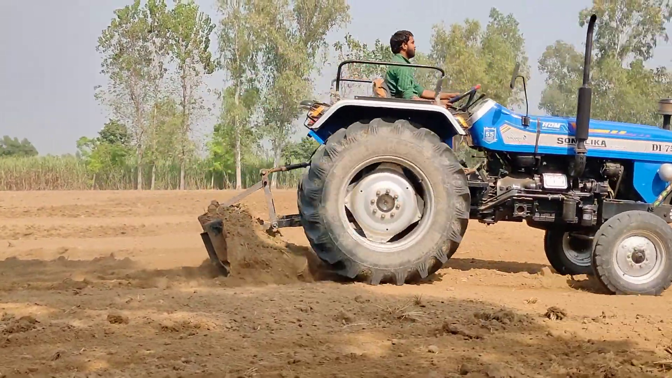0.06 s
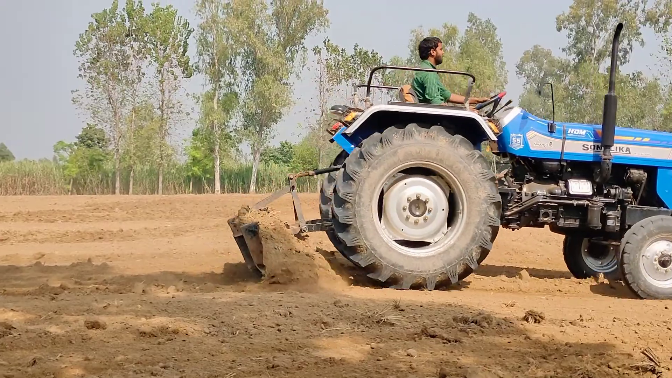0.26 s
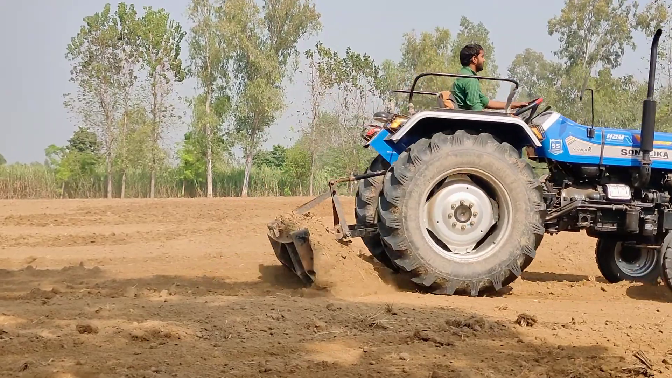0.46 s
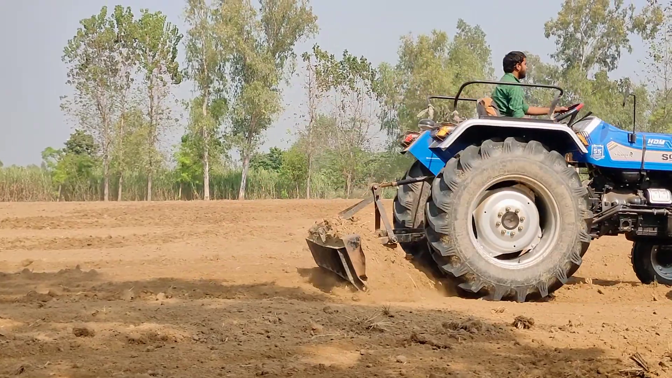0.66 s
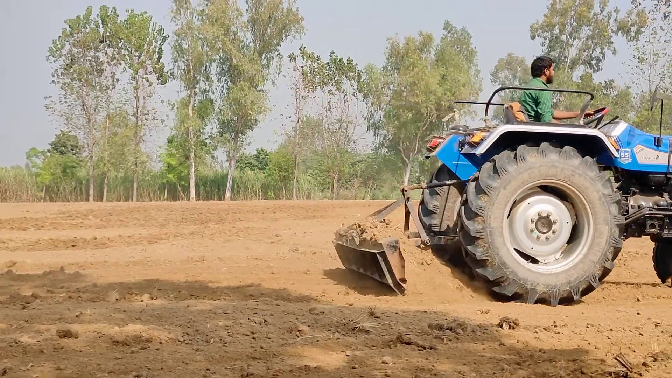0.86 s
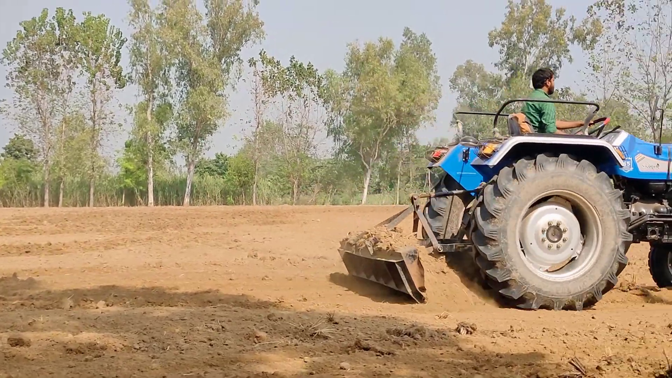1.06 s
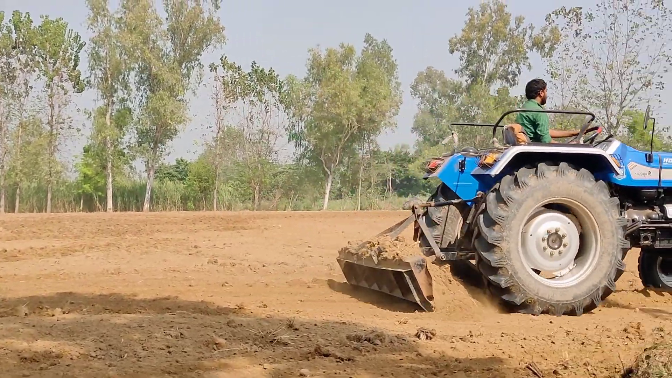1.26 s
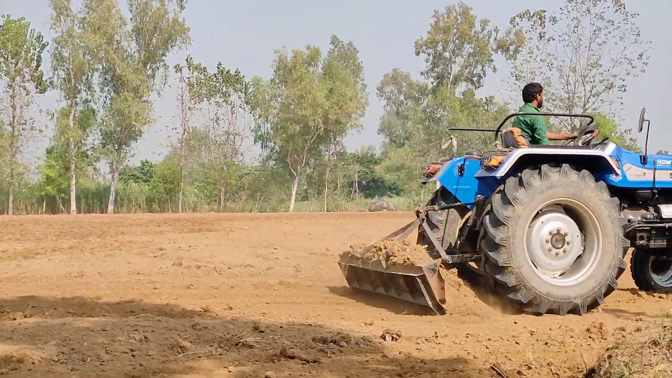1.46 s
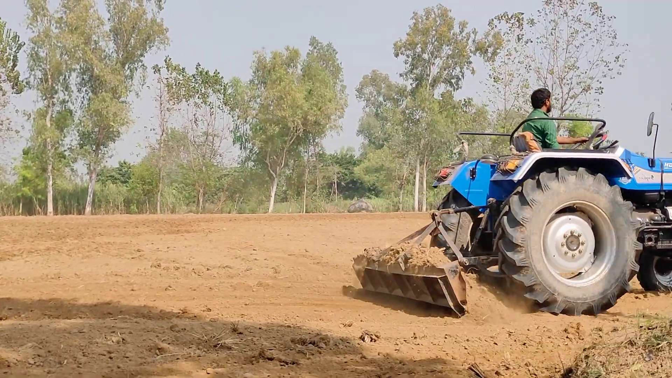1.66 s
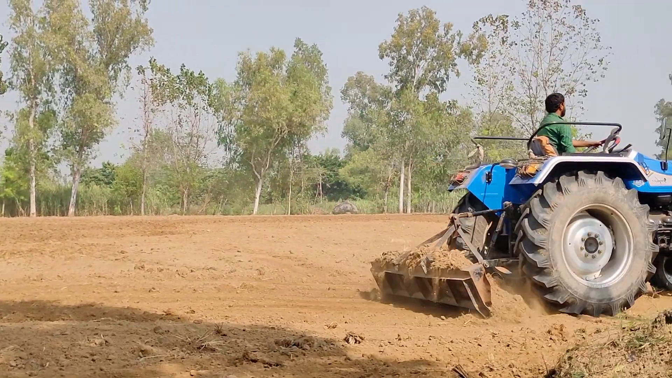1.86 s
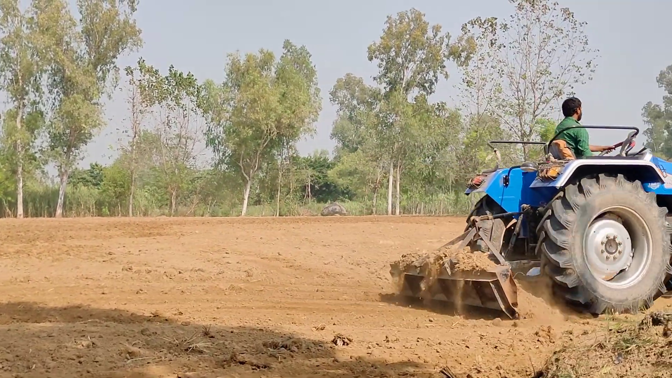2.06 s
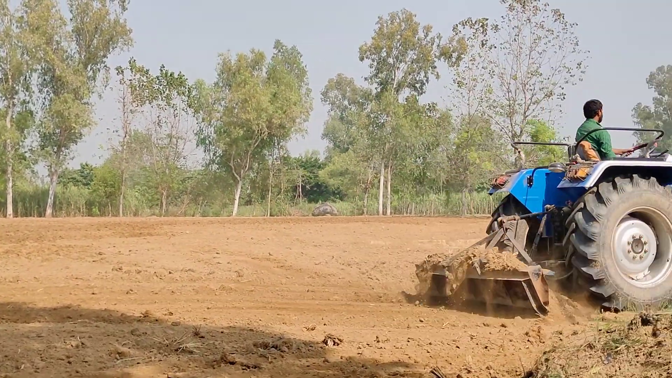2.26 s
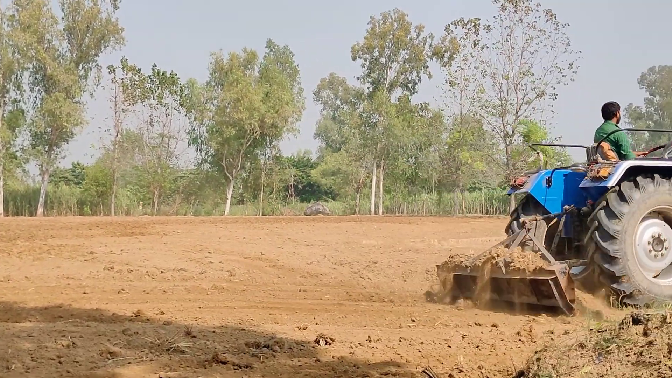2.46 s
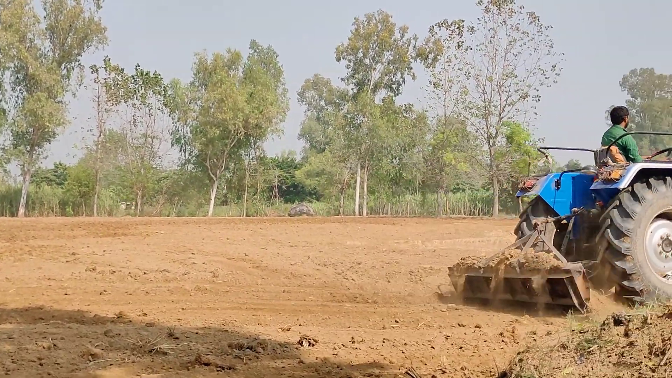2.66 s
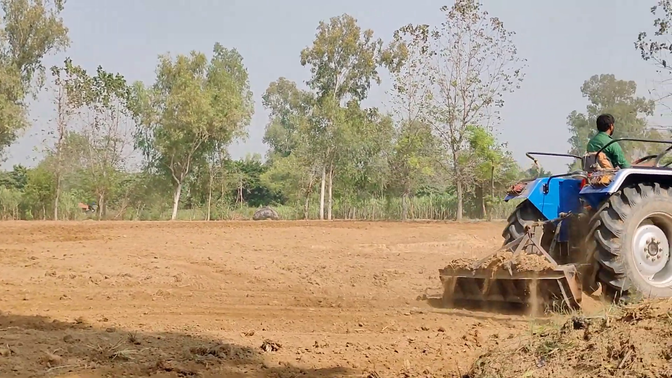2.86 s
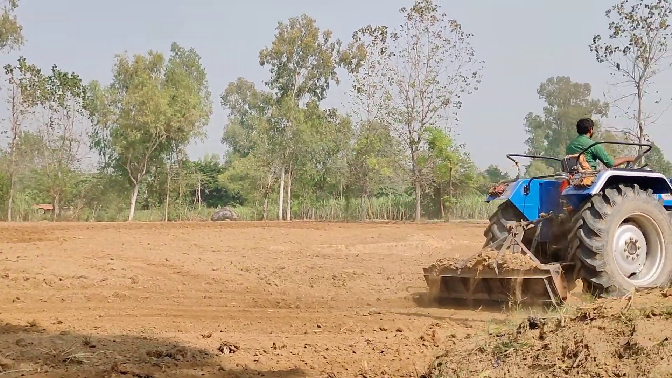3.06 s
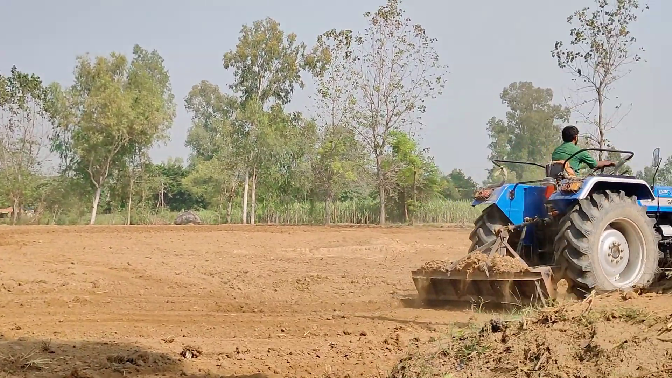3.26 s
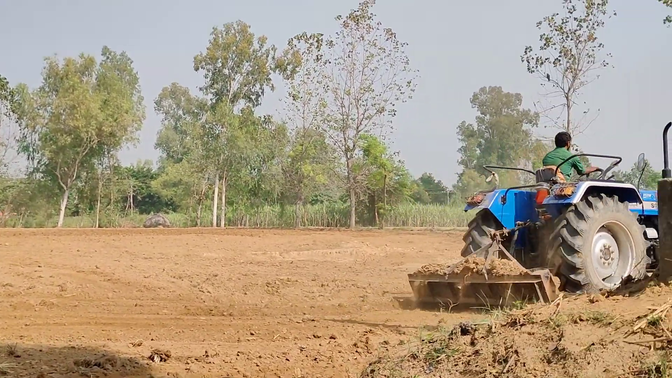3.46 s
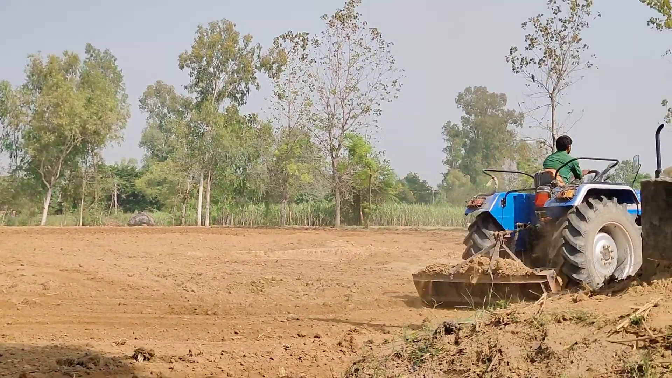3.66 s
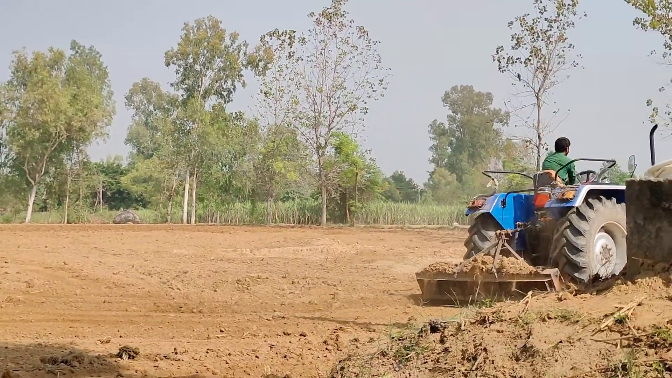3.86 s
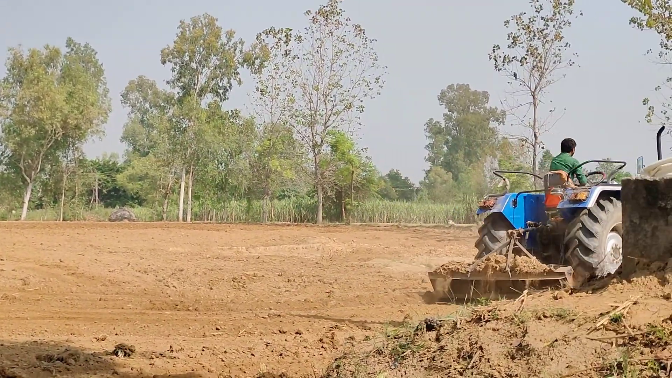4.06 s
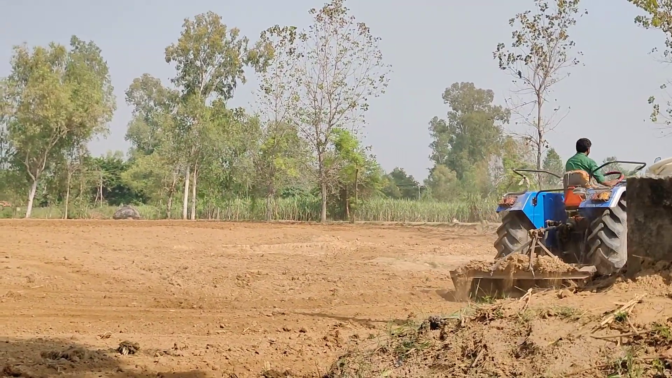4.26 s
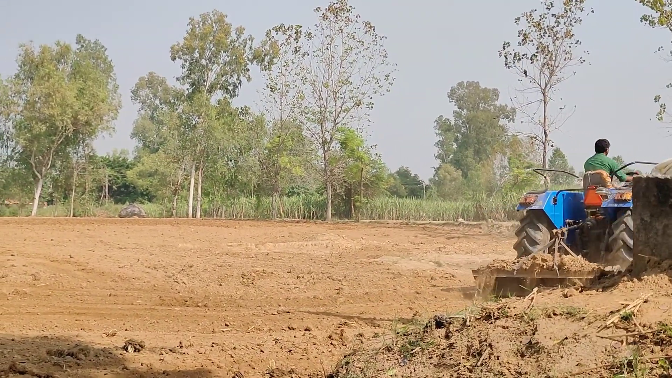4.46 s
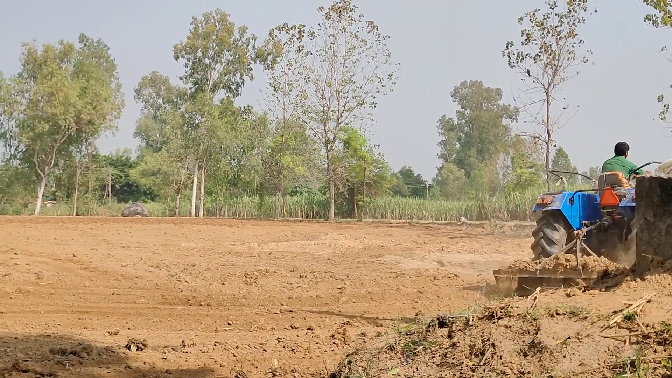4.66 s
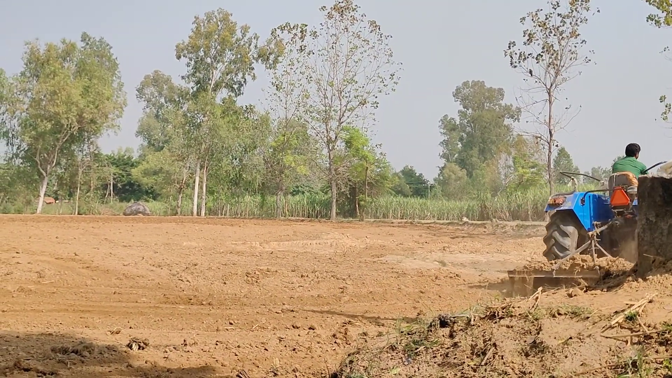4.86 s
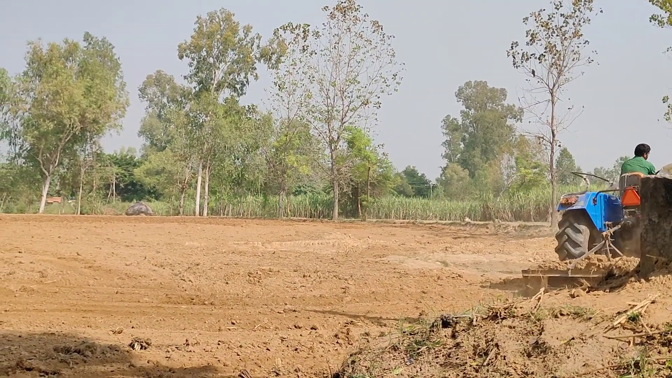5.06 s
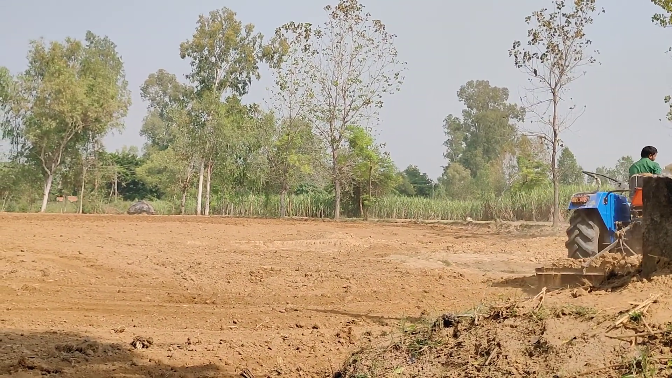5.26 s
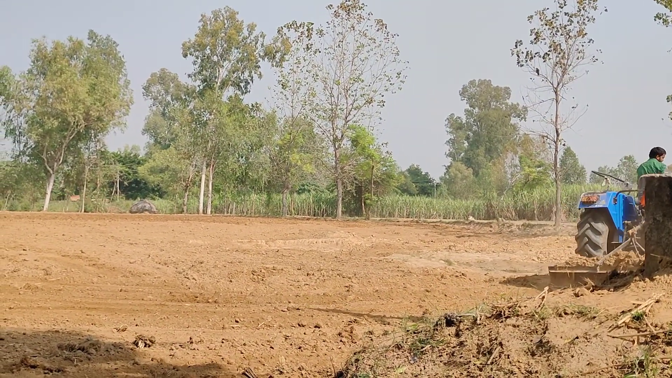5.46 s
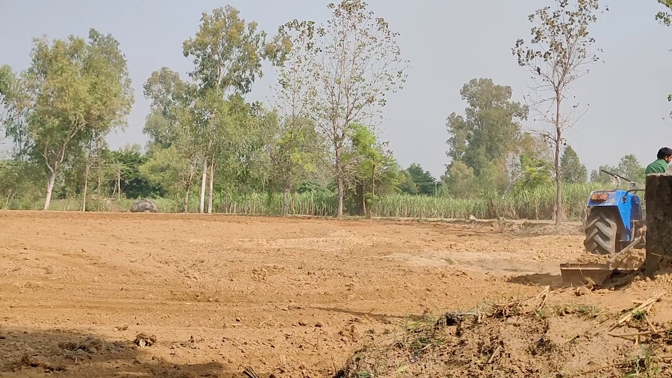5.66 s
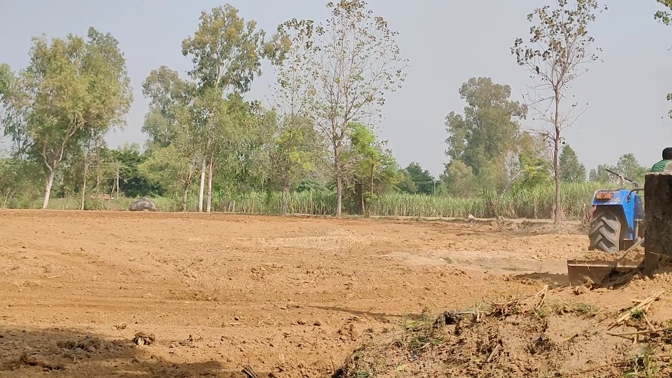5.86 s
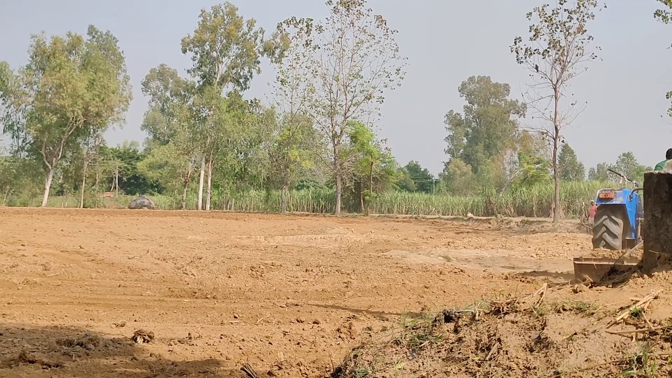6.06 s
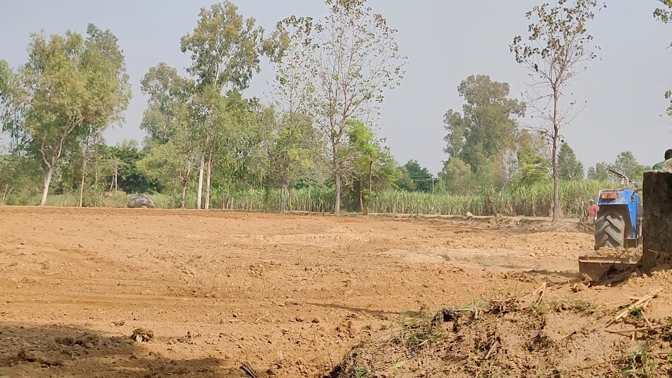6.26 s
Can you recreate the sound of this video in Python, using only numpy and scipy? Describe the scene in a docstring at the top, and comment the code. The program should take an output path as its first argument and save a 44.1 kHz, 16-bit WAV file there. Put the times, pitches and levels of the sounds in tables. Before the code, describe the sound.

At 0 seconds a diesel tractor is already close, side-on and at its loudest: about 35 exhaust thuds a second merge into a rough, throbbing low drone, with a sharp knock at each firing, puffing gas, clattering gears and a faint whine. Dry clods crackle along the dragged blade. The bass swells briefly at 0.1 and 1.1 seconds. The fuel eases at about 1.35, then at 1.5 the blade linkage gives one short rattle. The tractor turns away and recedes; whine and soil sounds fade. Around 2.5 to 3.2 the engine pulls slightly harder, with a hard knock near 2.6, then dips sharply at 3.3. From 4 seconds it slows; a hard knock lands near 4.7 and the power drops again near 4.9. It picks up slightly at 5.1 and labors at about 25 firings a second, duller and distant, until 6.3, over faint open-field hiss.

```python
"""A diesel tractor drags a leveller blade away over an open field, slowing from 35 to 25 firings a second.
Each firing gives a thud from the exhaust, built from sine waves, and a sharp knock of noise from the block.
Gas puffs and churns in the pipe, gears clatter and whine, and the fuel feed rises, eases and is cut twice.
Soil crumbles along the blade, the linkage rattles once, and the field hisses faintly behind it all."""
import sys
import numpy as np
from scipy import signal
from scipy.io import wavfile
from scipy.ndimage import uniform_filter1d

SR = 44100
rng = np.random.default_rng(int(sys.argv[2]) if len(sys.argv) > 2 else 0)


def log_audio(samples):
    """Write samples as a 16-bit WAV file to the path given in sys.argv[1]."""
    # one column per channel
    frames = np.atleast_2d(samples).T
    # limit to full scale, then quantise
    limited = np.clip(frames, -1, 1)
    pcm = np.round(limited * 32767).astype(np.int16)
    wavfile.write(sys.argv[1], SR, pcm)


N = 278271
T = np.arange(N) / SR  # time in seconds

# How loud the knock and the gears are. Columns: starting level in dB, dB gained from behind,
# dB gained per octave of slowing, share of the fuel change (a plain factor).
COMBUSTION_LEVEL = (-47.5, 12.5, -16, 1.5)
GEAR_LEVEL = (-41.5, -1.5, -9.5, 0.33)
# Tone of the clatter heard from behind. Each row: frequency in Hz, relative level in dB.
REAR_CLATTER_TONE = [(100, -4), (250, 5.5), (330, -14.5), (420, -1.5), (560, -10), (700, 0.5), (1050, -3),
                     (1450, -4.5), (2100, -5.5), (2750, -9), (3400, -2), (4800, 1), (6400, -11),
                     (8300, -34.5)]
BOOM_DB = 7  # lift at the centre of the exhaust resonance


def exhaust(turns):
    """One gas pulse a firing: its orders (multiples of the firing rate) pass the pipe and silencer."""
    # How loud each group of orders is. Columns: starting level in dB, dB gained from behind,
    # dB gained per octave of slowing, share of the fuel change (a plain factor).
    thud_level = (-38, 3.5, -0.5, 0.58)
    drone_level = (-41.5, -1, 13, 0.06)
    bark_level = (-37.5, -7, -4, 0.5)
    # What the pipe and silencer let through. Each row: frequency in Hz, relative gain in dB.
    pipe_gain = [(25, -5), (35, 4), (51, 5.5), (70, 2), (102, 22.5), (127, 4.5), (140, -2), (160, -5),
                 (175, 2), (209, 1), (240, -35), (320, -35.5)]
    fourth_db = 8.5  # lift of the fourth order at the centre of the resonance
    rate = firing_rate()
    number, _ = stroke(turns, lead=0.23)
    # the high orders fade as the tractor turns away and slows: slow firings are softer pulses
    dull_db_per_octave = 5 * away() + 25 * lugging()

    def orders(ks, lead, spread_db):
        """A group of orders, swelling and sinking a little from firing to firing."""
        ks = ks[:, None]
        hz = ks * rate
        octaves_up = np.log2(np.maximum(hz / 125, 1))
        gain = amp(np.interp(hz, *np.transpose(pipe_gain)) - dull_db_per_octave * octaves_up)
        # the silencer holds back what lies above its resonance
        lag = 2 * np.arctan(np.maximum(hz - 180, 0) / 25)
        lift = np.where(ks == 4, amp(fourth_db * boom(hz) / BOOM_DB), 1)
        waves = gain * lift * np.cos(2 * np.pi * ks * (turns + lead) - lag)
        steady = -waves.sum(0) / np.sqrt((gain ** 2).sum(0) / 2)
        return steady * uniform_filter1d(uneven(number, spread_db), size=400)

    thud_db = level(thud_level) + boom(2 * rate) + swells()
    drone_db = level(drone_level) + boom(3 * rate)
    bark_db = level(bark_level)
    thud = orders(np.arange(1, 3), lead=.035 - .1 * lugging(), spread_db=1.1)
    drone = orders(np.arange(3, 4), lead=-.08 * lugging(), spread_db=1.2)
    bark = orders(np.arange(4, 10), lead=.04 - .15 * lugging(), spread_db=1.8)
    return amp(thud_db) * thud + amp(drone_db) * drone + amp(bark_db) * bark


def stagger(turns, spread):
    """Each gas pulse leaves the pipe a little early or late; spread is in parts of a firing."""
    number, _ = stroke(turns, lead=0.41)
    return turns + spread * uniform_filter1d(rng.standard_normal(size=400)[number], size=600)


def boom(hz):
    """Lift or loss in dB of an exhaust order near the resonance or the trough of the pipe."""
    def bell(centre_hz, width_hz):
        """A smooth hump that is 1 at its centre."""
        return np.exp(-.5 * ((hz - centre_hz) / width_hz) ** 2)

    hollow_db = -6
    return BOOM_DB * bell(95, 6.7) + hollow_db * bell(55.6, 5.3)


def swells():
    """Brief swells of the bass, in dB."""
    # Each row: middle in seconds, seconds from there until about a third of the lift is left, lift in dB.
    bass_swells = [(0.102, 0.075, 5.5), (1.097, .035, 6)]
    return sum(db * np.exp(-((T - s) / half) ** 2) for s, half, db in bass_swells)


def knock(turns):
    """Ignition rattles the block for some milliseconds, harder under load."""
    # The hardest single firings. Each row: a time in seconds within the firing, extra knock in dB.
    hard_firings = [(1.636, 0.5), (2.626, 6), (2.795, 2.5), (3.674, 3.5), (4.683, 9.5)]
    # Tone of the knock. Each row: frequency in Hz, relative level in dB.
    knock_tone = [(150, -32), (300, -14), (550, -17), (1050, -27), (1500, -9.5), (2100, -31), (2750, -22.5),
                  (3200, 2.5), (4000, 6), (4900, 5), (5600, -2), (6300, -24), (7450, -22.5), (8300, -41.5)]
    number, age = stroke(turns, lead=0.27)  # ignition comes just before the gas pulse
    # every second firing knocks harder, by a varying amount
    alternate_db, scatter_db = 1, 0.44
    harder_db = (alternate_db + scatter_db * rng.standard_normal(size=400))[number]
    force_db = level(COMBUSTION_LEVEL) + harder_db * (number % 2 == 0)
    for s, db in hard_firings:
        force_db = force_db + db * (number == number[round(s * SR)])
    blow = burst(age, rise=.0022, decay=.0064) + .06 * burst(age, rise=.005, decay=.022)
    impacts = uneven(number, spread_db=.5) * blow * grit(spread_db=-2.8)
    rattle = colour(ring_block(impacts), knock_tone)
    return amp(force_db - 2.0) * rattle


def ring_block(x):
    """Panels and castings ring on after every impact."""
    # Ringing panels and castings. Each row: frequency in Hz, width in Hz, gain in dB.
    block_modes = [(401.6, 26, 1.5), (671, 26, -1), (1110, 24, -3), (1320, 27, -30.5), (1703, 89, 2.5),
                   (3175, 91, -4.5), (3900, 300, -9), (4800, 310, -5)]
    return x + ring(x, block_modes)


def puff(turns):
    """Gas rushes out of the pipe with every pulse; when the engine lugs it chuffs harder and duller."""
    # Tone of the rushing gas. Each row: frequency in Hz, relative level in dB.
    puff_tone = [(150, -23.5), (330, 3.5), (700, -0.5), (1100, 9), (1450, -6.5), (1750, 5.5), (2700, -7.5),
                 (4000, 4), (5500, -6), (6400, -10), (7450, 0), (8300, -23.5)]
    number, age = stroke(turns, lead=0.24)
    gear_db, load_db = level(GEAR_LEVEL), level(COMBUSTION_LEVEL)
    swell = burst(age, rise=.006, decay=.0058) * uneven(number, spread_db=.9)
    rush = colour(swell * grit(spread_db=0.0), puff_tone)
    body = signal.sosfilt(signal.butter(1, 1800, fs=SR, output="sos"), rush)
    effort_db = .3 * (load_db - gear_db)
    return amp(gear_db + effort_db - 4.5) * (rush + lugging() * body)


def clatter(turns):
    """Valves, injectors and gears rattle on between firings, in one tone from the bare flank, another behind."""
    # Tone of the clatter heard from the side. Each row: frequency in Hz, relative level in dB.
    side_tone = [(100, -9), (250, 0.5), (340, -7.5), (420, -5), (570, -14), (850, -6), (1300, 4.5),
                 (1520, -8), (1740, -2), (1950, -5), (2150, 0), (2750, -11), (3500, 0.5), (4300, -1),
                 (5500, -20), (7500, -16.5), (8300, -42)]
    _, age = stroke(turns, lead=0.32)
    surge = 1 + 0.71 * burst(age, rise=0.0033, decay=0.016)
    drive = ring_block(surge * grit(spread_db=1.0))
    side = amp(3.5) * colour(drive, side_tone)
    rear = amp(5) * colour(drive, REAR_CLATTER_TONE)
    return amp(level(GEAR_LEVEL)) * ((1 - away()) * side + away() * rear)


def moving_paths(x, depth_db, shimmer_db):
    """Reflections from ground and bodywork add and cancel in shifting bands, most in the treble."""
    hz, _, z = signal.stft(x, SR, nperseg=768, noverlap=576)
    slow, quick = rng.standard_normal((2, *z.shape))
    slow = unit(uniform_filter1d(slow, size=70, axis=1))
    quick = unit(uniform_filter1d(uniform_filter1d(quick, size=6, axis=0), size=7, axis=1))
    treble = np.minimum(hz / 3200, 1)[:, None]
    gain = amp(depth_db * slow * np.sqrt(treble) + shimmer_db * quick * treble)
    gain = gain / np.sqrt(np.mean(gain ** 2, axis=1, keepdims=True))
    return signal.istft(z * gain, nperseg=768, noverlap=576)[1][:N]


def whine(turns, db, wobble):
    """The timing gears hum on the twelfth order and fade as the flank turns away; wobble is in radians."""
    drift = unit(signal.sosfilt(signal.butter(2, 7, fs=SR, output="sos"), rng.standard_normal(N)))
    mesh = 12 * turns
    return amp(db - 17.8 * away()) * np.sqrt(2) * np.sin(2 * np.pi * mesh + wobble * drift)


def rumble():
    """Turbulent exhaust gas churns under the note, duller from behind."""
    # How loud the churning is: starting level in dB, dB gained from behind,
    # dB gained per octave of slowing, share of the fuel change (a plain factor).
    churn_level = (-41.5, 5, 2.5, 0.2)
    # Tone of the churning. Each row: frequency in Hz, relative level in dB.
    churn_tone = [(10, -14.5), (25, 4), (50, 1.5), (75, 2.5), (110, 1.5), (170, -5), (300, -40), (600, -43),
                  (2000, -78.5)]
    side = colour(rng.standard_normal(N), churn_tone)
    rear = signal.sosfilt(signal.butter(1, 102, fs=SR, output="sos"), side)  # gentle cut above 102 Hz
    return amp(level(churn_level) + swells()) * (side + away() * (rear - side))


def jolt():
    """The blade bites into hard ground and its linkage gives one short rattle."""
    start_s, jolt_db = 1.507, -32.5
    shake = burst(np.maximum(T - start_s, 0), rise=0.0017, decay=0.017)
    impacts = grit(spread_db=2)
    return amp(jolt_db) * shake * colour(ring_block(impacts), REAR_CLATTER_TONE)


def soil(clods_per_s, spread_db, db):
    """Clods break and tumble along the blade as random clicks, fainter as the tractor turns away."""
    # Tone of the crumbling soil. Each row: frequency in Hz, relative level in dB.
    soil_tone = [(150, -26), (500, 5), (1500, 2), (3000, -5.5), (5000, -8.5), (8000, -36.5)]
    size = amp(spread_db * np.minimum(rng.exponential(1, N), 4)) * rng.standard_normal(N)
    clods = size * (rng.random(N) < clods_per_s / SR)
    return amp(db - 13 * away()) * colour(clods, soil_tone)


def field_hiss(db):
    """Faint, even hiss of the open field, made of plain noise."""
    return amp(db) * rng.standard_normal(N)


def firing_rate():
    """Engine speed in firings a second, joined by straight lines between the rows."""
    # Engine speed. Each row: time in seconds, firings a second.
    speed_rows = [(0.0, 34.5), (0.44, 35.48), (0.88, 34.71), (2.44, 34.08), (2.69, 35.64), (3.0, 34.6),
                  (3.3, 34.94), (3.44, 31.66), (3.65, 34.35), (4.09, 31.87), (4.41, 31.31), (4.6, 29.15),
                  (4.79, 29.87), (4.98, 23.79), (5.32, 25.76), (6.31, 25.22)]
    s, rate = np.transpose(speed_rows)
    return np.interp(T, s, rate)


def lugging():
    """How far the engine has sunk below its top speed, in octaves."""
    rate = firing_rate()
    return np.log2(rate.max() / rate)


def stroke(turns, lead):
    """Number of the current firing, and the seconds since it began; lead is in parts of a firing."""
    number = np.floor(turns + lead + 1).astype(int)
    return number, (turns + lead) % 1 / firing_rate()


def fuel():
    """Fuel above or below the steady feed, in dB before each part takes its share."""
    # The governor feeds more fuel as the blade bites, less as it slips, and twice almost none.
    # Each row: start in seconds, length in seconds, change in dB before the share.
    fuel_steps = [(0.64, 0.13, -2.5), (1.344, 0.12, -5), (1.507, 0.081, 3.5), (2.442, .34, 1.5),
                  (2.867, .13, -2.5), (3.02, 0.26, 2), (3.325, 0.12, -13.5), (3.7, 0.21, -4.5),
                  (4.12, 0.15, 2.5), (4.497, 0.344, -5.5), (4.885, .19, -15), (5.125, 0.18, 3.5)]
    ramp_s = .04

    def ramp(s):
        """A short slope from 0 to 1 centred on the given time."""
        return np.clip((T - s) / ramp_s + .5, 0, 1)

    return sum(db * (ramp(s) - ramp(s + length)) for s, length, db in fuel_steps)


def away():
    """The tractor turns its back: 0 side on, nearing 1 from behind."""
    start_s, turn_s = 0.3, 1.41
    return 1 - np.exp(-(np.maximum(T - start_s, 0) / turn_s) ** 1.27)


def level(part):
    """Level of a part in dB: it falls with distance and follows heading, engine speed and fuel."""
    db, rear_db, slow_db, share = part
    nearest_m, speed_m_per_s = 4.61, 1.875  # a straight drive, nearest at the very start
    distance_m = np.hypot(nearest_m, speed_m_per_s * T)
    distance_db = -20 * np.log10(distance_m / nearest_m)
    return db + distance_db + rear_db * away() + slow_db * lugging() + share * fuel()


def uneven(number, spread_db):
    """No two firings are equally strong: each gets its own random gain."""
    return amp(spread_db * rng.standard_normal(size=400))[number]


def burst(age, rise, decay):
    """A swell with a short rise and an exponential tail, both in seconds."""
    return (1 - np.exp(-(age / rise) ** 2)) * np.exp(-age / decay)


def grit(spread_db):
    """Noise made of tiny impacts of unequal size, each 32 samples long."""
    size_db = np.repeat(rng.standard_normal(N // 32 + 1), 32)[:N]
    return unit(rng.standard_normal(N) * amp(spread_db * size_db))


def ring(x, modes):
    """A bank of resonances driven by x."""
    return sum(amp(db) * signal.lfilter(*signal.iirpeak(hz, hz / width, SR), x) for hz, width, db in modes)


def colour(x, spectrum):
    """Shapes the tone without sounding ahead of time, so attacks stay sharp; the result has rms 1."""
    hz, db = np.transpose(spectrum)
    f = abs(np.fft.fftfreq(8192, 1 / SR))
    log_gain = np.log(amp(np.interp(np.log(f + 1), np.log(hz), db)))
    # the minimum-phase filter with this gain
    taps = np.fft.ifft(np.exp(np.conj(signal.hilbert(log_gain)))).real
    return unit(signal.oaconvolve(x, taps[:len(taps) // 2])[:N])


def unit(x):
    """Scales to rms 1."""
    return x / np.sqrt(np.mean(x ** 2) + 1e-20)


def amp(db):
    """Decibels to gain."""
    return 10 ** (np.asarray(db) / 20)


def scene():
    """One crankshaft times every part of the engine."""
    turns = np.cumsum(firing_rate()) / SR + .09  # firings so far
    note = amp(-1.75) * exhaust(stagger(turns, spread=.006))
    engine_noise = knock(turns) + puff(turns) + clatter(turns)
    rattle = moving_paths(engine_noise, depth_db=2.7, shimmer_db=2.0)
    hum = whine(turns, db=-57.0, wobble=0.9)
    crumbling = soil(clods_per_s=500, spread_db=4.5, db=-47.5)
    bed = rumble() + jolt() + crumbling + field_hiss(db=-71.5)
    return (note + hum + rattle + bed)[None]


def record(dry):
    """The microphone loses the deepest bass; then a steep filter removes what lies above the band edge."""
    edge_hz = 8350
    thin = signal.sosfilt(signal.butter(2, 20, "highpass", fs=SR, output="sos"), dry)
    band_limit = signal.firwin(301, edge_hz, window=("kaiser", 8), fs=SR)
    return signal.oaconvolve(thin, band_limit[None], "same")


dry = scene()
out = record(dry)
log_audio(out)
```